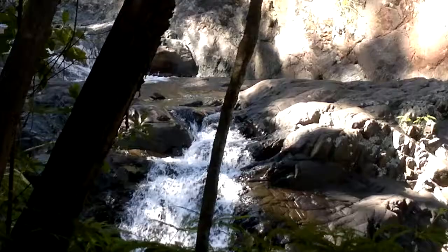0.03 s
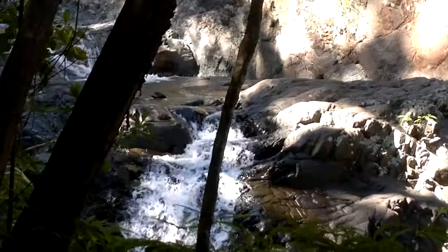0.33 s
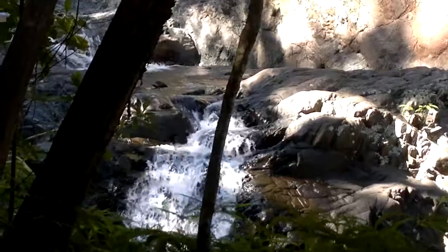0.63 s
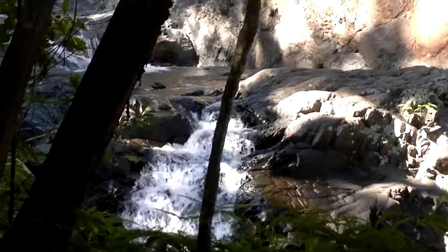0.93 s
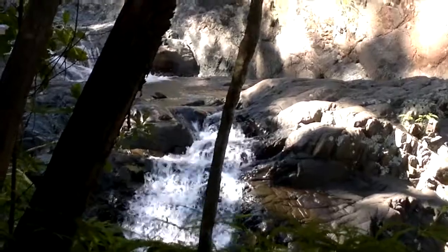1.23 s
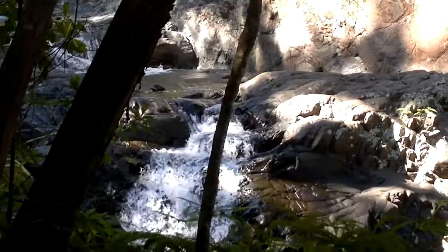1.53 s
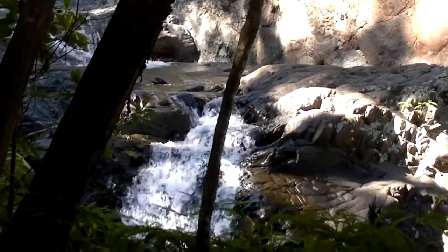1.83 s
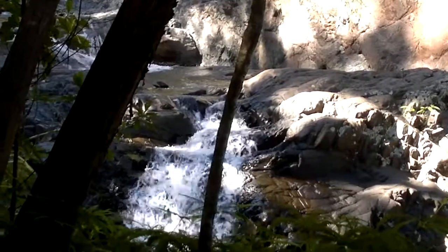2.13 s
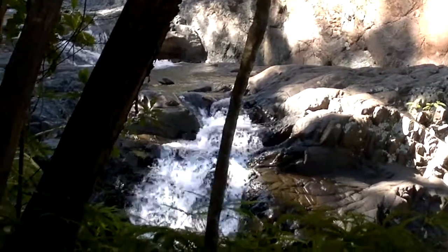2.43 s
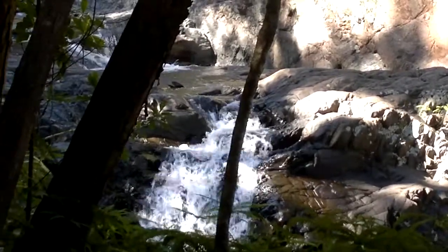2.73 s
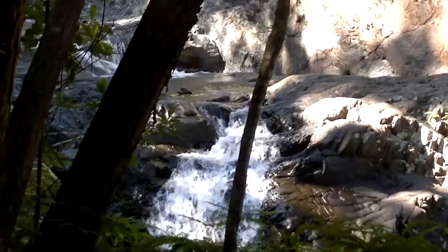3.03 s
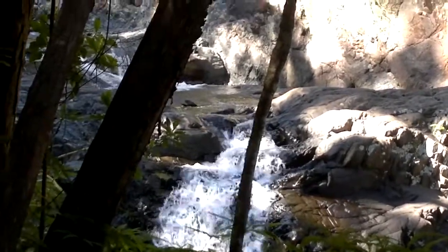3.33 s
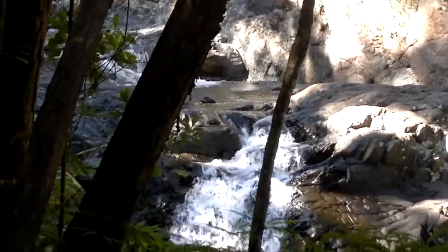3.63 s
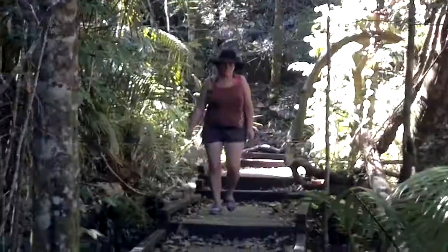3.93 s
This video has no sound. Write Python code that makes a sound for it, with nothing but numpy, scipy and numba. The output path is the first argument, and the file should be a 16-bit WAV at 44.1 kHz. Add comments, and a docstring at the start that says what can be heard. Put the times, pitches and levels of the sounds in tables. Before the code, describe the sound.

A small waterfall cuts in at about 0.3 seconds, rushing steadily over rocks into a forest pool, heard from the bank. Faint gulps and plops run through its wide, foamy hiss. Light splashes of spray come near 1.2, 2.2, 3.2 and 3.6 seconds, and soft low thuds near 2.1 and 3.7. The level stays even until the water cuts off at about 3.8 seconds.

```python
"""A small cascade tumbles over rocks into a forest pool, heard from the bank through a stereo microphone.
Entrained air resonates: thousands of bubbles a second ring as damped oscillators over the hiss of foam.
Larger air pockets gulp and plop at their own resonances, the plunge shakes the bubble cloud into soft
thuds, and spray slaps down in short bursts. The sound cuts in just after the start and out before the end."""
import sys
import numpy as np
from scipy import signal
from scipy.fft import rfft, irfft
from scipy.io import wavfile
from scipy.ndimage import map_coordinates
from numba import njit

SR = 44100
rng = np.random.default_rng(int(sys.argv[2]) if len(sys.argv) > 2 else 0)


def put_to_file(sound):
    """Save the sound as 16-bit audio at rate SR, in the file named by the first command-line argument."""
    columns = np.atleast_2d(sound).T  # one column per channel
    safe = np.clip(columns, -1, 1)
    whole_steps = np.round(safe * 32767)
    wavfile.write(sys.argv[1], SR, whole_steps.astype(np.int16))


N = 176400
T = np.arange(N) / SR
FREQS = np.fft.rfftfreq(N, 1 / SR)
SIDES = np.array([[1], [-1]])  # left, right
BUBBLE_LOW_HZ, BUBBLE_HIGH_HZ = 300, 12000


def undb(db):
    """Amplitude ratio of a level in decibels."""
    return 10 ** (np.asarray(db) / 20)


def unit(x):
    """Normalisation to an rms of 1."""
    return x / np.sqrt(np.mean(x ** 2))


def over_hz(points):
    """Interpolation of (Hz, value) points along a logarithmic frequency axis."""
    hz, value = np.array(points, float).T
    return np.interp(np.log(FREQS + 1), np.log(hz), value)


def wander(rate_hz):
    """Smooth random modulation with a standard deviation near 1."""
    steps = rng.standard_normal(1024)
    return map_coordinates(steps, [T * rate_hz], order=3, mode="wrap")


@njit
def ring(start, hz, cycles, amplitude, rise, sr, length):
    """Damped oscillation: each bubble is a decaying sine whose pitch rises as it nears the surface."""
    out = np.zeros(length)
    for k in range(len(start)):
        life = cycles[k] * sr / hz[k]  # samples to fall by 20 dB
        omega = 2 * np.pi * hz[k] / sr
        phasor = amplitude[k] + 0j
        step = np.exp(1j * omega - 2.3 / life)
        glide = np.exp(1j * omega * rise / life)
        for i in range(start[k], min(length, start[k] + int(2.5 * life))):
            out[i] += phasor.imag
            phasor *= step
            step *= glide
    return out


def bubbles(per_s=12000, cycles_at_1khz=9, rise=.08, spread_db=3, even_below_hz=1700):
    """Superposition of bubble resonances, many faint and a few strong, with like power at every pitch."""
    count = int(per_s * N / SR)
    when, pitch, life, strength = rng.random((count, 4)).T
    start = (when * N).astype(np.int64)
    root_low, root_high = np.sqrt(BUBBLE_LOW_HZ), np.sqrt(BUBBLE_HIGH_HZ)
    hz = (root_low + pitch * (root_high - root_low)) ** 2
    cycles = cycles_at_1khz * 2 ** (2 * life - 1) * (hz / 1000) ** .5
    scatter = unit(undb(-spread_db * np.log(1 - .985 * strength)))
    uneven = np.minimum(hz / even_below_hz, 1) ** 2  # low bubbles differ less in strength
    amplitude = np.sqrt(uneven * scatter ** 2 + 1 - uneven) * hz ** .75 / np.sqrt(cycles)
    return unit(ring(start, hz, cycles, amplitude, rise, float(SR), N))


def white_water(foam_db=1):
    """Incoherent sources add in power: bubbles and broadband foam hiss sum to a flat spectrum."""
    inside = (FREQS > BUBBLE_LOW_HZ) & (FREQS < BUBBLE_HIGH_HZ)
    swarm = rfft(bubbles()) * inside * np.sqrt(inside.mean())
    foam_gain = undb(foam_db)
    foam = foam_gain * rfft(rng.standard_normal(N))
    return (swarm + foam) / np.sqrt(inside + foam_gain ** 2)


def rush_spectrum():
    """Partial coherence: the two microphone ports share the low rush, while the high hiss is wide."""
    # colour of the rushing water: frequency_hz, relative_density_db
    colour = [(25, -21.5), (57, -23.5), (80, -12), (130, -19), (185, -11), (225, -11.8), (290, -7.2),
              (400, -8), (490, -2), (570, -2), (650, -1.1), (770, -7.4), (1000, -5.5), (1200, -7.5),
              (1400, -10.5), (2150, -8.5), (2650, -11.5), (3000, -6.5), (3800, -5.5), (4400, -7.5),
              (5200, -12), (6250, -10.5), (7700, -20), (9000, -21.5), (10500, -25.5), (13000, -30.5),
              (15300, -39)]
    # likeness of left and right: frequency_hz, coherence (0-1)
    likeness = [(30, .25), (70, 0.87), (130, 0.83), (250, 0.97), (600, 1), (770, 0.86), (1150, 0.82),
                (1550, 0.44), (2100, 0.22), (3200, 0.1), (5600, 0.08), (6900, 0.2), (10000, 0.1)]
    # level difference between the ports: frequency_hz, left_minus_right_db
    balance = [(80, 7), (190, 2.5), (330, 0.8), (600, -1.3), (760, -2), (1150, 1.5), (1550, -2.5),
               (2200, .2), (2600, -1.2), (3700, -2), (4400, -1.5), (5150, 5), (6000, -2), (7700, 3.5),
               (11000, 1.5), (15000, 2.5)]
    # phase difference between the ports: frequency_hz, left_lead_rad
    port_phase = [(80, -0.1), (300, -0.02), (550, -0.55), (760, 0.29), (1400, 0.3), (1750, 0.7),
                  (2050, 1.64), (2800, 2), (4800, 1.3), (5600, 3.5), (6400, 5.5), (8000, 7), (10500, 4.5),
                  (13000, 8)]
    coherence = np.clip(over_hz(likeness), 0, .99)
    mid = white_water() * np.sqrt(1 + coherence)
    side = white_water() * np.sqrt(1 - coherence)
    lean = undb(SIDES * over_hz(balance) / 2)
    ports = lean / np.hypot(*lean) * np.exp(1j * SIDES * over_hz(port_phase) / 2)
    return np.array([mid + side, mid - side]) * ports * undb(over_hz(colour))


def cascade(level_db=-24):
    """Amplitude modulation: the rush surges slightly as a whole and flickers octave by octave."""
    # drift of the treble: time_s, left_db, right_db
    treble = [(.3, -0.8, -0.8), (1.1, -0.6, -0.5), (1.2, -0.5, 0.6), (1.3, -0.7, -.4), (2.08, -0.5, -0.4),
              (2.14, 0, 0), (2.21, -0.9, 1), (2.26, -1, -.6), (2.8, -0.3, 0), (3.12, -0.1, 0),
              (3.23, 0.3, 2), (3.36, -0.8, 0), (3.55, -0.6, 0.9), (3.76, -0.8, 0.5)]
    # drift of the low gurgle: time_s, gain_db
    gurgle = [(.3, 0), (.95, 0), (1.33, -0.6), (1.62, 0.3), (2.25, 0.6), (2.6, -0.8), (2.76, -1),
              (2.9, 0.2), (3.03, -1), (3.25, 0.2), (3.42, -1), (3.76, 0)]
    spectrum = rush_spectrum()
    surge_db = 0.12 * wander(rate_hz=7.32)
    times, left, right = np.array(treble).T
    treble_db = np.array([np.interp(T, times, left), np.interp(T, times, right)])
    gurgle_db = np.interp(T, *np.array(gurgle).T)
    sizzle_db = 1.1 * np.maximum(T - 3.1, 0)  # the upper hiss brightens a little from 3.1 s on
    centres_hz = 100 * 2. ** np.arange(8)
    out = 0
    for hz, weights in zip(centres_hz, np.eye(len(centres_hz))):
        band = irfft(spectrum * over_hz(list(zip(centres_hz, weights))), N)
        drift_db = treble_db * (hz > 2400) + gurgle_db * (150 < hz < 1100)
        drift_db = drift_db + sizzle_db * (4500 < hz < 9000)
        flicker_db = (2.5 if hz < 150 else 0.35) * wander(rate_hz=24)
        out = out + band * undb(surge_db + flicker_db + drift_db)
    return unit(out) * undb(level_db)


def pockets(rows, swell_s, decay_s, rise_per_s, gain_db, pan_db, spread_oct=.35, pan_spread_db=1.2):
    """Mass-spring resonance of water on trapped air: each tone swells, glides upward and dies away."""
    out = np.zeros((2, N))
    for (peak_s, hz, db), (turn, length, glide, place) in zip(rows, rng.uniform(-1, 1, (len(rows), 4))):
        age = np.clip(T - peak_s, -.5, .5)
        decay = decay_s * 2 ** (spread_oct * length)
        swell = np.exp(-(age / swell_s) ** 2)
        tail = np.exp(1 - np.hypot(1, age / decay * 2))
        cycles = turn + hz * (age + rise_per_s * (1 + glide) * age ** 2 / 2)
        tone = np.where(age < 0, swell, tail) * np.sin(2 * np.pi * cycles)
        side_db = (pan_db + pan_spread_db * place) * SIDES / 2
        out += undb(db + gain_db + side_db) * tone
    return out


def gulps():
    """Volume resonance: large air pockets under the fall are soft springs and ring low."""
    # large air pockets: peak_s, pitch_hz, relative_level_db
    large_pockets = [(.337, 613, -29), (.457, 592, -25.4), (.47, 462, -28.3), (.61, 667, -29),
                     (.752, 689, -28.7), (.776, 516, -28.5), (.869, 570, -28), (.969, 559, -25.8),
                     (1.071, 624, -26.5), (1.115, 527, -29), (1.17, 559, -27.6), (1.276, 527, -29),
                     (1.412, 516, -28), (1.479, 559, -23.5), (1.517, 624, -27.6), (1.588, 667, -28),
                     (1.65, 613, -26.2), (1.707, 549, -26.2), (1.75, 667, -27.1), (1.76, 462, -29.7),
                     (1.911, 592, -27), (1.962, 506, -26.5), (2.048, 495, -29), (2.1, 592, -26.7),
                     (2.242, 678, -26), (2.268, 715, -29), (2.299, 656, -28.5), (2.395, 506, -29),
                     (2.442, 667, -26.8), (2.48, 549, -25.2), (2.492, 715, -28.5), (2.53, 645, -28.3),
                     (2.583, 570, -28.3), (2.609, 624, -28.5), (2.698, 602, -29), (2.868, 592, -25.8),
                     (2.894, 527, -26.2), (2.921, 559, -27), (3.016, 516, -29), (3.096, 549, -28.5),
                     (3.175, 602, -27.6), (3.248, 581, -26.7), (3.287, 624, -23.8), (3.582, 656, -27.3),
                     (3.615, 559, -28), (3.769, 495, -27)]
    return pockets(large_pockets, swell_s=0.0062, decay_s=0.0089, rise_per_s=5, gain_db=0.1, pan_db=-1)


def plops():
    """Resonant frequency varies inversely with radius: smaller pockets among the rocks ring higher."""
    # smaller air pockets: peak_s, pitch_hz, relative_level_db
    small_pockets = [(.469, 1152, -32), (.588, 1030, -31), (.686, 861, -31), (.766, 947, -27),
                     (1.099, 893, -30), (1.183, 904, -30), (2.014, 990, -33), (2.37, 904, -30.5),
                     (2.402, 958, -31), (2.753, 950, -28), (3.109, 850, -31), (3.322, 1205, -29.5)]
    return pockets(small_pockets, swell_s=0.0045, decay_s=0.011, rise_per_s=4.5, gain_db=-0.5, pan_db=.5)


def thuds():
    """Collective oscillation: the plunge shakes the pool's bubble cloud, which rings as one deep body."""
    # pulses of the bubble cloud: peak_s, pitch_hz, relative_level_db
    cloud_pulses = [(.635, 75, -45.5), (.744, 83, -42), (1.215, 89, -44.5), (1.628, 80, -46),
                    (1.89, 82, -43), (2.062, 80, -43), (2.124, 81.5, -35), (2.259, 80, -43),
                    (3.144, 86, -43), (3.688, 78, -37)]
    return pockets(cloud_pulses, swell_s=.028, decay_s=0.025, rise_per_s=.1, gain_db=1.3, pan_db=4.5)


def splashes(band_hz=(2800, 6000), attack_s=.003, decay_s=0.01, pan_db=-2):
    """Impact noise: thrown spray lands in quick bursts of hiss, a little to the right."""
    # landings of spray: peak_s, level_db
    landings = [(1.187, -29), (2.152, -33), (2.207, -30), (3.224, -31), (3.597, -31.5)]
    bursts = sum(undb(db) * np.exp(-np.maximum((peak_s - T) / attack_s, (T - peak_s) / decay_s))
                 for peak_s, db in landings)
    bandpass = signal.butter(2, band_hz, "band", fs=SR, output="sos")
    hiss = unit(signal.sosfilt(bandpass, rng.standard_normal((2, N))))
    return bursts * hiss * undb(SIDES * pan_db / 2)


def scene():
    """Linear superposition: gulps, plops, thuds and splashes add to the steady cascade."""
    events = gulps() + plops() + thuds() + splashes()
    return cascade() + events


def record(dry):
    """Gating and band limiting: the sound cuts in and out, and a low-pass removes the highest treble."""
    start_s, stop_s, fade_in_s, fade_out_s = 0.2796, 3.785, 0.0064, 0.0045
    fringe_db, fringe_s = -13.5, 0.0116  # faint sound just outside each cut
    top_hz = 15600
    gate = np.clip((T - start_s) / fade_in_s, 0, 1) * np.clip((stop_s - T) / fade_out_s, 0, 1)
    fringe_in = np.clip((T - start_s + fringe_s) / fade_out_s, 0, 1)
    fringe_out = np.clip((stop_s - T) / (1.8 * fringe_s) + 1, 0, 1)
    gated = dry * np.maximum(gate, undb(fringe_db) * fringe_in * fringe_out)
    lowpass = signal.ellip(10, .1, 80, top_hz, fs=SR, output="sos")
    return signal.sosfilt(lowpass, gated)


dry = scene()
out = record(dry)
put_to_file(out)
```